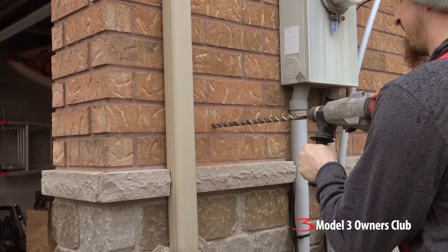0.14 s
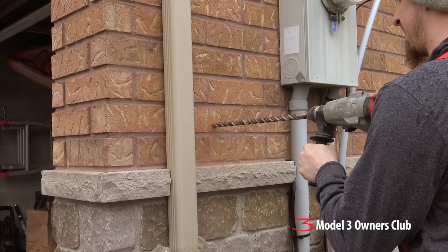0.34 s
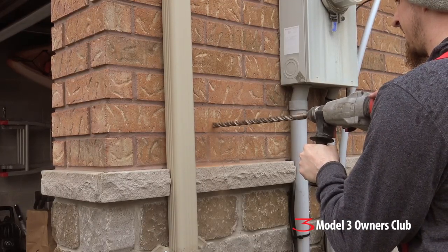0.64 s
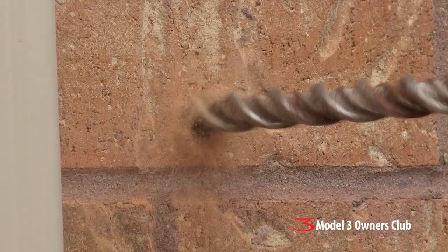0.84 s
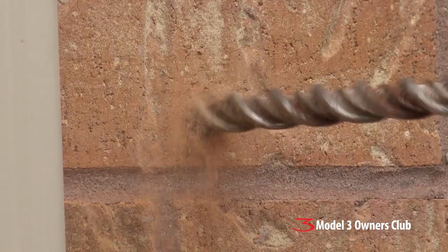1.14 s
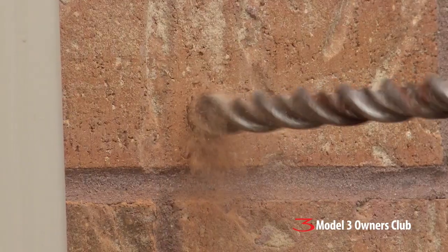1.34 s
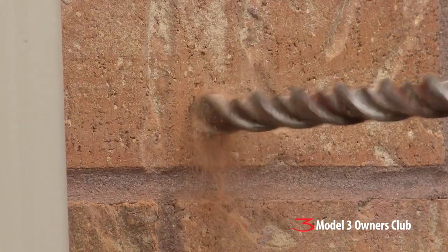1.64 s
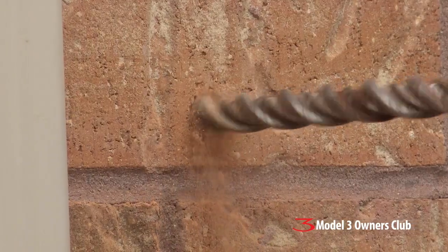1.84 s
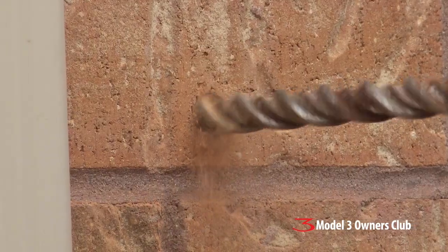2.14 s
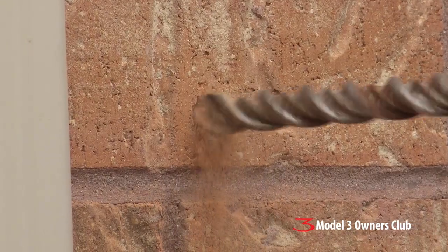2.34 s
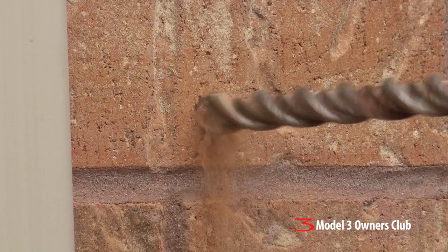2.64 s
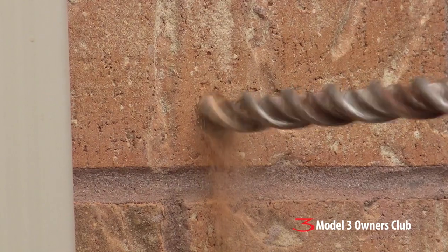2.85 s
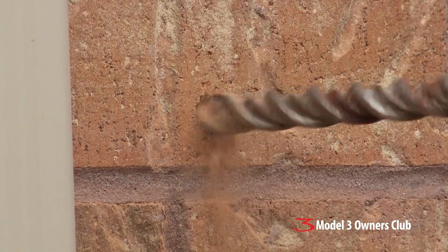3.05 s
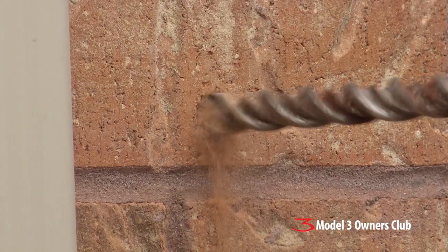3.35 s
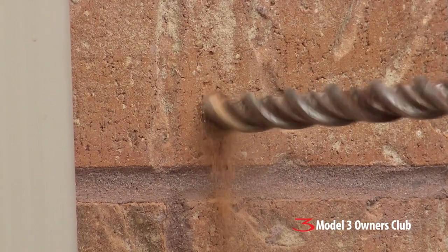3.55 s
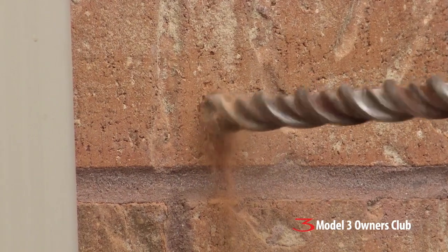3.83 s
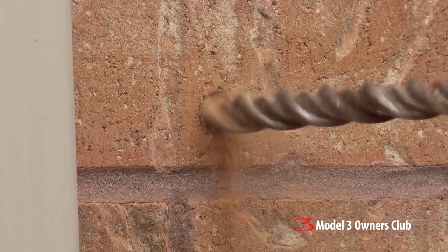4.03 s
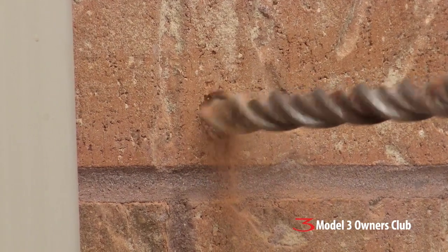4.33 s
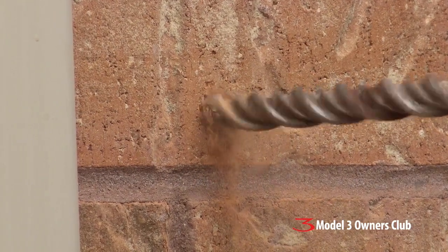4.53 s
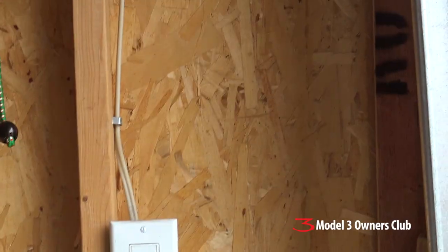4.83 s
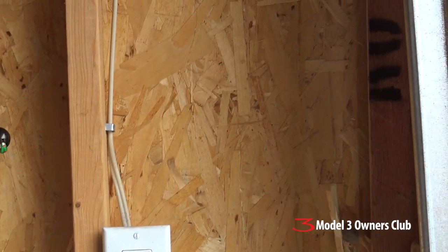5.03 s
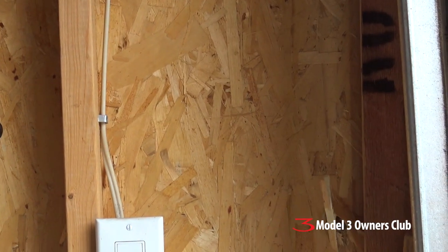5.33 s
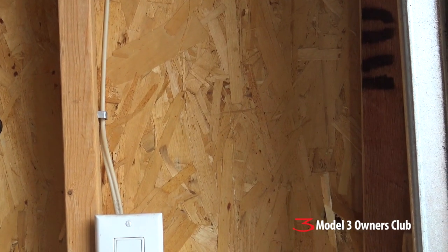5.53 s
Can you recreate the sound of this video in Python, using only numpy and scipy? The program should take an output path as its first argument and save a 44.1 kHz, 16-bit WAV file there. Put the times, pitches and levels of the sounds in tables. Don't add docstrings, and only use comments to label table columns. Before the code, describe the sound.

Rapid rattling hammer drilling in a brick wall cuts to a windy close-up, then indoors a thud, ringing steel bit and falling crumbs.

```python
import sys
import numpy as np
from scipy import signal
from scipy.fft import rfft, irfft
from scipy.io import wavfile
from scipy.ndimage import uniform_filter1d

SR = 44100
rng = np.random.default_rng(int(sys.argv[2]) if len(sys.argv) > 2 else 0)


def volts(x):
    e = np.asarray(x, float) / 20
    return 10 ** e


def unload_wav(signal):
    wavfile.write(
        sys.argv[1],
        SR,
        np.round(np.clip(np.atleast_2d(signal).T, -1, 1) * 32767).astype(np.int16),
    )


N = 250488
TIME = np.arange(N) / SR
FAR_PART, NEAR_PART, INDOOR_PART = range(3)
SCENE_CHANGES = 0, .9245, 4.7945, 6


def unit(x):
    return x / np.sqrt(np.mean(x ** 2))


def colour(x, points):
    hz, db = np.transpose(points)
    bins = np.maximum(np.arange(N // 2 + 1) * SR / N, 1)
    gain = volts(np.interp(np.log(bins), np.log(hz), db))
    return irfft(rfft(x) * gain, N)


def ring(x, hz, width_hz):
    r = np.exp(-np.pi * width_hz / SR)
    return signal.lfilter([1 - r, 0, r - 1], [1, -2 * r * np.cos(2 * np.pi * hz / SR), r * r], x)


def walk(rate_hz):
    k = int(SR / rate_hz)
    held = np.repeat(rng.standard_normal(N // k + 1), k)
    return unit(uniform_filter1d(held, k)[:N])


def gravel(spread_db):
    return unit(rng.standard_normal(N) * volts(spread_db * rng.exponential(size=N)))


def hits(table):
    out = np.zeros(N)
    for s, db, *_ in table:
        out[int(s * SR)] = volts(db)
    return out


def inside(part):
    return (TIME >= SCENE_CHANGES[part]) & (TIME < SCENE_CHANGES[part + 1])


def swell_db(s, db, swell_s, fade_s):
    return db - 20 * np.where(TIME < s, (s - TIME) / swell_s, (TIME - s) / fade_s)


def blend(levels_db):
    return np.sqrt(sum(volts(db) ** 2 for db in levels_db))


def wind():
    # freq_hz, level_db (per Hz)
    buffet_colour = [(20, -30.5), (50, -7), (100, -6), (250, -6), (400, -11.5), (700, -29.5)]
    # peak_s, level_db, swell_s, fade_s (both for 20 dB)
    gust_table = [
        (1.02, -33.5, 0.255, 0.03),
        (1.42, -37.5, 0.55, 1.15),
        (1.56, -33, .06, 0.41),
        (1.8, -39.5, 2.04, 1.85),
        (1.9, -32, 0.21, .6),
        (2.39, -34.5, 0.076, 0.12),
        (2.83, -41, 0.195, 0.22),
        (3.1, -46, 0.34, 1.4),
        (3.44, -51, 0.052, 0.2),
        (4.72, -54, .4, -3.56),
    ]
    calm_db = -55.5
    gain = inside(NEAR_PART) * blend([calm_db] + [swell_db(*gust) for gust in gust_table])
    turbulence = rng.standard_normal(N) * volts(2.63 * walk(24.95))
    return gain * unit(colour(turbulence, buffet_colour))


def debris():
    # start_s, level_db (peak), pitch_hz
    thud_table = [
        (4.9155, -13.5, 319),
        (4.93, -13.5, 150),
        (5.245, -24, 258),
        (5.282, -20.5, 303),
        (5.409, -13.5, 640),
        (5.459, -21, 668),
        (5.574, -21, 668),
        (5.598, -15, 536),
        (5.617, -18.5, 228),
    ]
    # start_s, level_db (peak), pitch_hz, width_hz
    ping_table = [
        (5.2657, -28, 9550, 500),
        (5.286, -33, 7620, 40),
        (5.287, -35.5, 9400, 40),
        (5.288, -36, 5740, 40),
        (5.4592, -37, 9240, 50),
        (5.461, -37.5, 7570, 50),
        (5.4922, -31, 9200, 400),
        (5.517, -29, 10500, 600),
        (5.54, -33, 7400, 200),
        (5.566, -31, 10300, 500),
    ]
    # peak_s, level_db, brightness_db, swell_s, fade_s
    slide_table = [
        (4.922, -23.5, -20.5, .003, 0.14),
        (4.952, -31, 16.5, 0.025, 0.054),
        (5.035, -31.5, 7.5, 0.043, 0.094),
        (5.16, -37, -13, 0.157, 0.19),
        (5.291, -39, 11, .04, 0.053),
        (5.41, -29, -3, 0.204, 0.094),
        (5.461, -32, 3.5, 0.0295, 0.124),
        (5.612, -26.5, -3.5, 0.1225, 0.123),
    ]
    # offset_db, brightness_share, room_db (quiet room)
    crumb_bands = [
        (-0.26, -0.065, -46.5),
        (-5.5, 0.3, -41.5),
        (-8.5, 1.112, -45.5),
    ]
    # freq_hz, level_db (per Hz)
    rumble_colour = [(60, -26.5), (110, -2.5), (250, -1.5), (650, -5), (1200, -11), (1800, -38.5)]
    scrape_colour = [(700, -16), (1300, -2.5), (2700, -3.5), (4500, -6.5), (6500, -34.5)]
    hiss_colour = [(3000, -13.5), (5000, 1.5), (8000, -1), (12000, -7.5), (15500, -17.5)]

    out = np.zeros(N)
    for s, db, hz in thud_table:
        thud = ring(ring(hits([(s + 0.002953, db)]), hz, 0.292 * hz), hz, 2.3 * hz)
        out += volts(-4.0) * thud * SR / (np.pi * .45 * hz)
    for s, db, hz, width_hz in ping_table:
        out += ring(hits([(s, db)]), hz, width_hz) * SR / (2 * np.pi * width_hz)
    for (offset_db, share, room_db), points in zip(crumb_bands, (rumble_colour, scrape_colour, hiss_colour)):
        slides = [swell_db(s, db + offset_db + share * bright_db, *shape)
                  for s, db, bright_db, *shape in slide_table]
        crumbs = unit(colour(gravel(1.97) * volts(1.57 * walk(70)), points))
        out += inside(INDOOR_PART) * blend([room_db] + slides) * crumbs
    return out


def loose_bit():
    # freq_hz, width_hz, level_db
    loose_modes = [
        [(5282, 54, 0), (5367, 51, -7.5), (3300, 106, -14.5), (6400, 60, -28), (7840, 80, -22.5)],
        [(10789, 56, -2.5), (10640, 40, -12), (13200, 83, -24.5)],
    ]
    # start_s, click_db, low_ring_db, high_ring_db
    last_blows = [
        (4.9237, -17.5, -23, -21),
        (4.9741, -11.5, -16.5, -19),
        (5.0074, -18, -36, -23),
        (5.025, -17.5, -27, -27),
        (5.0409, -14.5, -26, -24.5),
        (5.0589, -14, -25.5, -23.5),
        (5.0759, -21, -34.5, -14.5),
        (5.091, -18, -35, -19.5),
    ]
    # peak_s, level_db, swell_s, fade_s, release_s (once caught)
    rattle_table = [
        (4.968, -21, 0.0245, 0.343, .016),
        (5.08, -16.5, 0.187, 0.1305, 0.064),
    ]
    breakthrough_s, caught_s = 4.921, 5.165

    s, click_db, *ring_db = np.transpose(last_blows)
    out = volts(-0.5) * ring(hits(zip(s, click_db)), 9000, 7000)
    until_blow_s = np.append(s, 9)[np.searchsorted(s, TIME)] - TIME
    choke = np.clip(until_blow_s / 0.00314, .3, 1) * (TIME > breakthrough_s)
    for (*shape, release_s), cluster, blow_db, rattle_db in zip(rattle_table, loose_modes, ring_db, (-3, -7)):
        gain = volts(swell_db(*shape) - 20 * np.maximum(TIME - caught_s, 0) / release_s)
        rattle, blows = np.zeros(N), np.zeros(N)
        for hz, width_hz, db in cluster:
            rattle += volts(db) * ring(gravel(1.2) * volts(1.34 * walk(150)), hz, width_hz)
            struck = ring(ring(hits(zip(s, blow_db)), hz, width_hz), hz, 12 * width_hz)
            blows += volts(db) * struck * SR / (2 * np.pi * width_hz)
        out += choke * (volts(rattle_db) * gain * unit(rattle) + volts(3.0) * blows)
    return out


def binding_db():
    # start_s, end_s, level_db
    binds = [
        (1.472, 1.943, 7),
        (4.062, 4.375, 4),
    ]
    edge_s = 0.039
    return sum(db * np.clip(np.minimum(TIME - start, end - TIME) / edge_s + .5, 0, 1)
               for start, end, db in binds)


def effort(levels_db, push, part):
    # share_grind, share_low_ring, share_high_ring, share_hum (dB of layer per dB of push or binding)
    push_shares = (0.49, 0.145, 1, 1.24)
    bind_shares = (0.03, 1.045, 0.062, 0.055)
    push_db = np.interp(TIME, *np.transpose(push))
    return [inside(part) * volts(db + a * push_db + b * binding_db())
            for db, a, b in zip(levels_db, push_shares, bind_shares)]


def blow_count(speed, first, part):
    s, rate = np.transpose(speed)
    s = np.append(s, SCENE_CHANGES[part + 1])
    return np.transpose([s, first + np.append(0, np.cumsum(rate * np.diff(s)))])


def flecks(blows, low_hz, high_hz):
    out, t = np.zeros(N + 600), np.arange(600) / SR
    count = np.arange(int(blows[-1][1]))
    when, pitch, size = rng.random((len(count), 3)).T
    s, struck_so_far = np.transpose(blows)
    starts = (np.interp(count + .2 + .5 * when, struck_so_far, s) * SR).astype(int)
    pitch_hz = low_hz + pitch ** 2 * (high_hz - low_hz)
    for i, hz, db in zip(starts, pitch_hz, -16 * size):
        out[i:i + len(t)] += volts(db) * t * np.exp(-t / 0.00181) * np.sin(2 * np.pi * hz * t)
    return out[:N] / np.sqrt(np.sum(out ** 2) / (s[-1] - s[0]) / SR)


def drill(blows, gains, hum, grit, modes, fades, rattles, holds, floor_db, fleck_db, hiss_fade, hum_db, wobble,
          knock_db, rasp_db):
    # freq_hz, level_db (per Hz)
    rasp_colour = [(4000, -30), (5000, -8.5), (5800, 2.5), (6500, -11), (7200, -5), (7900, -5),
                   (8800, -50.5)]
    count = np.interp(TIME, *np.transpose(blows))
    blow, phase = count.astype(int), count % 1
    strike = unit(np.diff(blow, prepend=blow[0]))
    strike = np.roll(strike, 16) + volts(-23.0) * np.roll(strike, 310) + volts(-10) * np.roll(strike, 500)

    def per_blow(scatter_db):
        return volts(scatter_db * rng.standard_normal(blow[-1] + 1))[blow]

    def shake(fade):
        rise = np.clip(phase / 0.0746, 0, 1) * np.clip((1 - phase) / 0.229, 0, 1)
        return volts(floor_db) + rise * np.exp(-phase / fade)

    def struck(cluster, fade, rattle, hold):
        out = np.zeros(N)
        for hz, width_hz, db in cluster:
            force = (strike + rattle * shake(fade) * gravel(1.7)) * per_blow(0.77)
            out += volts(db) * ring(ring(force, hz, width_hz), hz, 5 * width_hz)
        return unit(out * volts(-11 / (1 + np.exp((hold - phase) / 0.0336))))

    tones = np.zeros(N)
    for k, db in hum:
        angle = 2 * np.pi * (k * count + rng.random()) + wobble * walk(25)
        tones += volts(db + 3.97 * wobble * walk(9)) * np.sin(angle)

    knock, low_ring, high_ring = map(struck, modes, fades, rattles, holds)

    force = per_blow(1.0)
    dull = colour(gravel(1.15) * shake(5.8) * force, [(2500, -3), (6000, -7.0)])
    bright = colour(gravel(1.48) * shake(hiss_fade) * force, [(2500, -5), (6000, 2.0)])
    chips = unit(colour(dull + bright, grit))
    rasp = unit(colour(gravel(1.1) * shake(0.5) * force, rasp_colour))

    brick = volts(knock_db) * knock + volts(2.5) * chips + volts(fleck_db) * flecks(blows, 3057.4, 3796)
    steel = volts(-2.75) * low_ring + volts(rasp_db) * rasp
    grind_gain, low_gain, high_gain, housing_gain = gains
    out = volts(hum_db) * housing_gain * unit(tones)
    out += grind_gain * brick
    out += low_gain * steel
    return out + volts(-2.17) * high_gain * high_ring


def boring_from_behind():
    # start_s, rate_hz (blows)
    speed = [(0, 65.24), (.46, 65.93)]
    # time_s, level_db
    push = [(0, -0.8), (.8, -0.8), (.92, -4)]
    # harmonic (multiple of the blow rate), level_db
    hum = [(1, -21.5), (2, -27.5), (3, -7.5), (4, -13), (5, -6), (6, -0.5), (7, -13), (8, -10), (9, 0.5),
           (10, -11), (11, -10), (12, -2.5), (13, -4.5), (14, -25.5), (15, -7), (16, -13.5), (17, -15.5),
           (18, -14)]
    # freq_hz, level_db (per Hz)
    grit = [(60, -44.5), (100, -14), (300, -15), (600, -5), (1150, -8.5), (1600, -7.5), (2100, -7.5),
            (3300, -7.5), (4700, -7.5), (5600, -5), (8800, -13), (11000, -8.5), (13500, -17),
            (15600, -36.5)]
    # freq_hz, width_hz, level_db
    modes = [
        [(1007.8, 50.6, 2), (1450, 178, 2), (2000, 276, -1.5)],
        [(5310, 106, 0.5), (5505, 184, -3), (5848, 456, 0.5), (6000, 110, -15), (7570, 300, -4)],
        [(11260, 70, -15.5), (10853, 200, 7), (11500, 2400, -10.5), (13200, 370, -25.5)],
    ]
    # grind_db, low_ring_db, high_ring_db, hum_db
    layer_levels = (-30.5, -34.5, -30, -36)
    return drill(blow_count(speed, .12, FAR_PART), effort(layer_levels, push, FAR_PART), hum, grit, modes,
                 fades=(.9, .6, .6), rattles=(2.5, 3.5, 4.5), holds=(.95, .6, .45), floor_db=-3, fleck_db=-18,
                 hiss_fade=0.464, hum_db=-0.48, wobble=0.477, knock_db=-5, rasp_db=-4)


def boring_close_up():
    # start_s, rate_hz (blows)
    speed = [(.925, 62.16), (1.846, 61.76), (2.767, 62.06), (3.32, 61.35)]
    # time_s, level_db
    push = [(.93, -2), (1.08, -0.34), (1.45, -1.5), (2, 0.29), (3.9, 1.14), (4.3, 1.52), (4.47, 1),
            (4.79, 1.23)]
    # harmonic (multiple of the blow rate), level_db
    hum = [(1, -17), (3, -6), (5, -18.5), (6, -8), (7, -3.5), (8, -7.5), (9, 3), (10, -12), (11, -6),
           (12, 0), (13, 3), (14, -3.5), (15, -8), (16, 0.5), (18, -10.5), (20, -7), (23, -5.5),
           (24, -13.5), (27, -4.5), (28, -5)]
    # freq_hz, level_db (per Hz)
    grit = [(60, -39), (300, -20), (500, -12.5), (850, -12.5), (1150, -15.5), (1500, -4.5), (2150, -6),
            (2650, -11), (3300, -9), (4800, -14), (6500, -16.5), (8500, -18), (11500, -14), (15600, -28.5)]
    # freq_hz, width_hz, level_db
    modes = [
        [(1415, 244, -1.53), (1491.8, 139, -0.98), (1683, 70, -17.5), (2060, 189, 0.15)],
        [(5533, 192, 0), (5618, 215, -7), (6090, 180, -5.5), (6890, 275, -9), (7620, 130, -6.5)],
        [(10650, 205, -1), (11031, 110, 8), (12040, 540, -4), (13000, 200, -26)],
    ]
    # grind_db, low_ring_db, high_ring_db, hum_db
    layer_levels = (-31, -38.5, -33.5, -36.5)
    return drill(blow_count(speed, .67, NEAR_PART), effort(layer_levels, push, NEAR_PART), hum, grit, modes,
                 fades=(.9, .6, .5), rattles=(.45, .5, 3.5), holds=(.95, .2, .55), floor_db=-14, fleck_db=-10.5,
                 hiss_fade=0.425, hum_db=0.9, wobble=0.163, knock_db=-4.5, rasp_db=-0.5)


def scene():
    # freq_hz, level_db (side minus mid)
    side_colour = [(40, -15), (150, -22.5), (500, -21.5), (900, -34), (3500, -28), (5600, -23.5),
                   (7500, -24), (9500, -28), (10900, -20.5), (12500, -42.5), (15500, -34.5)]
    mid = wind() + debris() + loose_bit() + boring_from_behind() + boring_close_up()
    width_db = 1.5 + 0.41 * binding_db() + 2.95 * walk(12)
    side = colour(np.roll(mid, 40), side_colour) * volts(width_db)
    return np.array([mid + side, mid - side])


def top_cut(x):
    return signal.sosfilt(signal.butter(12, 15720, fs=SR, output="sos"), x)


def record(dry):
    rounded = np.tanh(2.186 * dry) / 2.2545
    return top_cut(rounded)


dry = scene()
out = record(dry)
unload_wav(out)
```